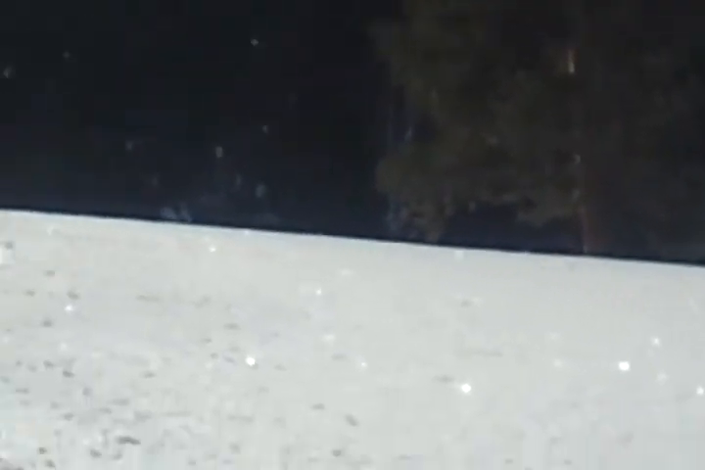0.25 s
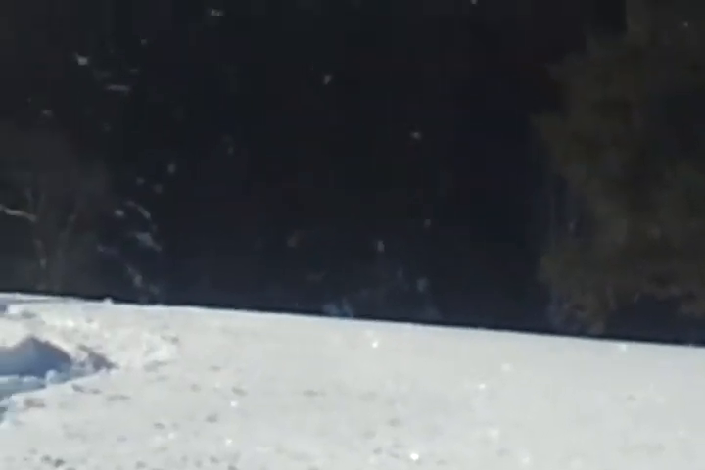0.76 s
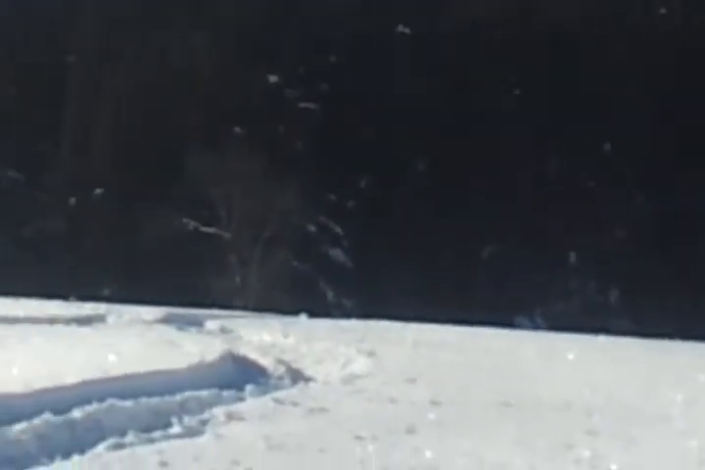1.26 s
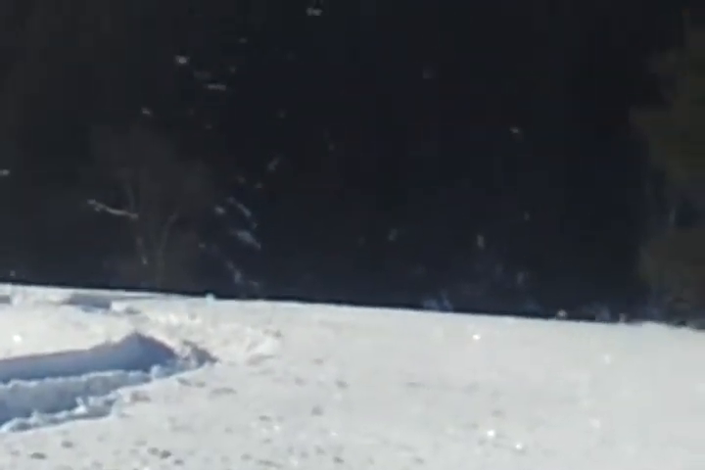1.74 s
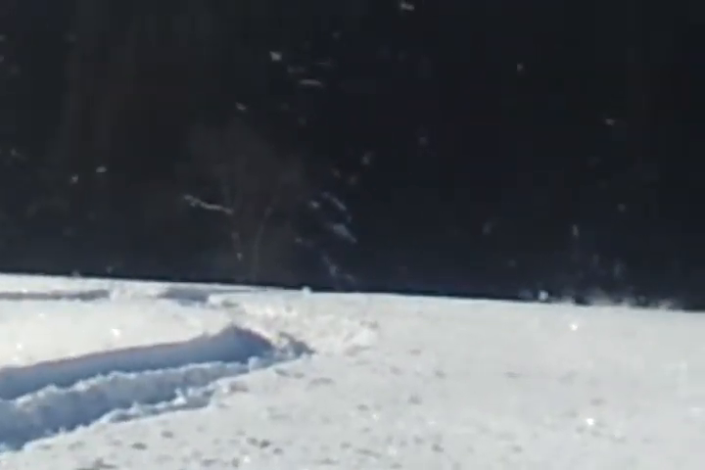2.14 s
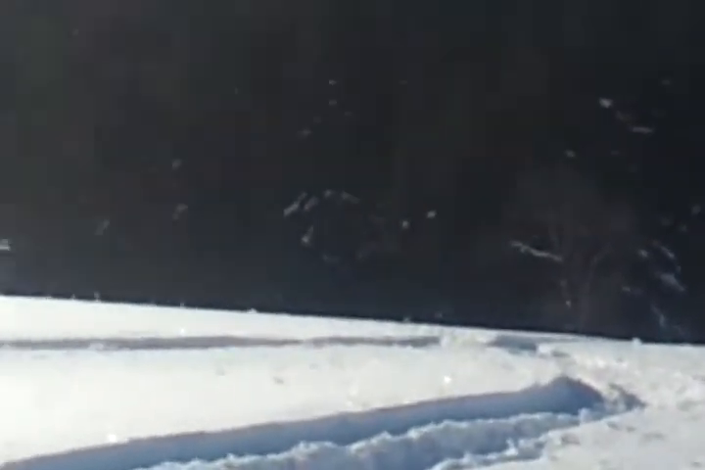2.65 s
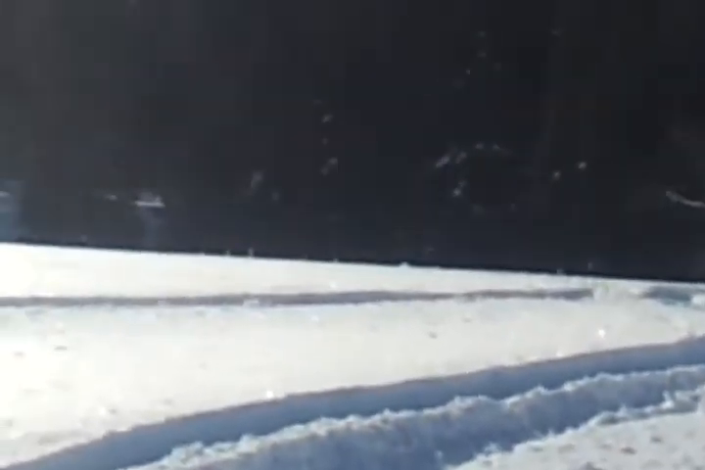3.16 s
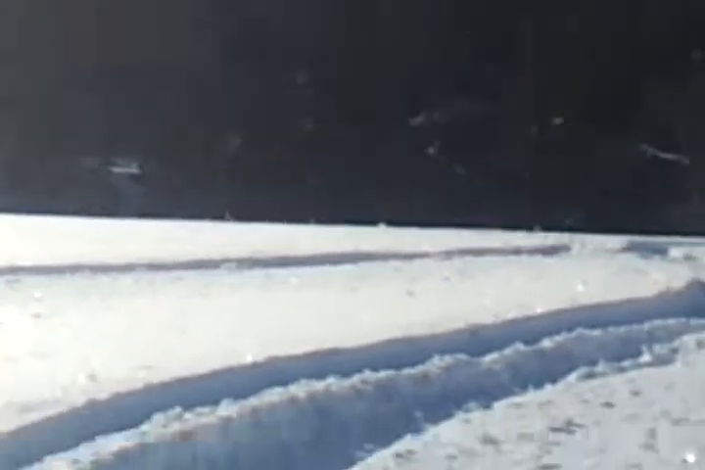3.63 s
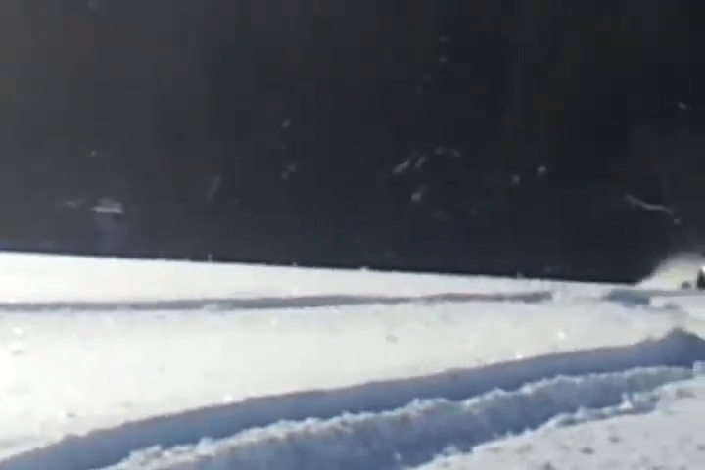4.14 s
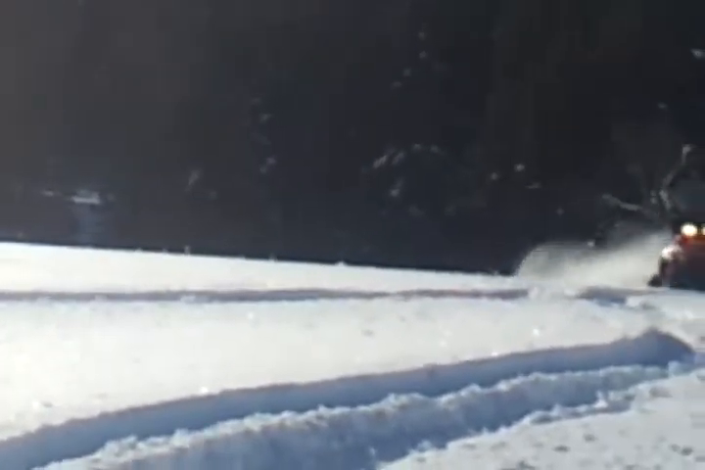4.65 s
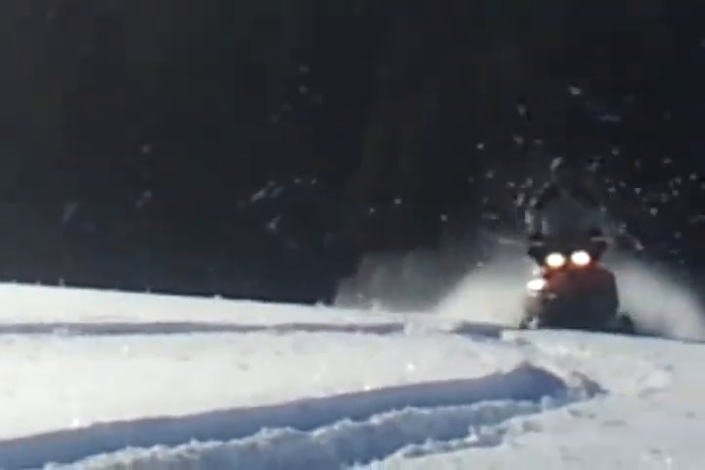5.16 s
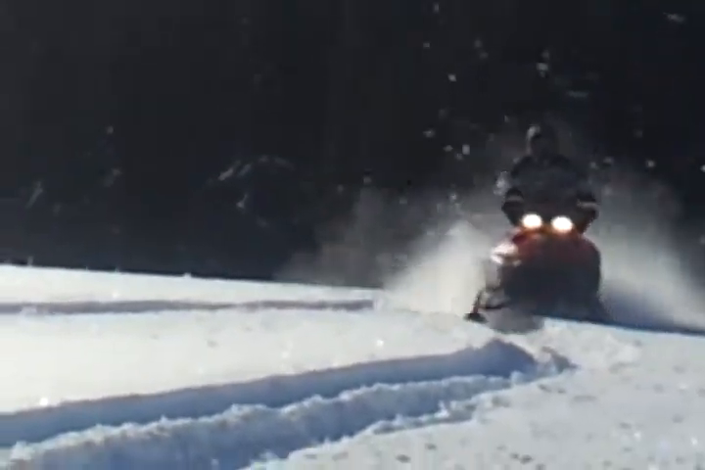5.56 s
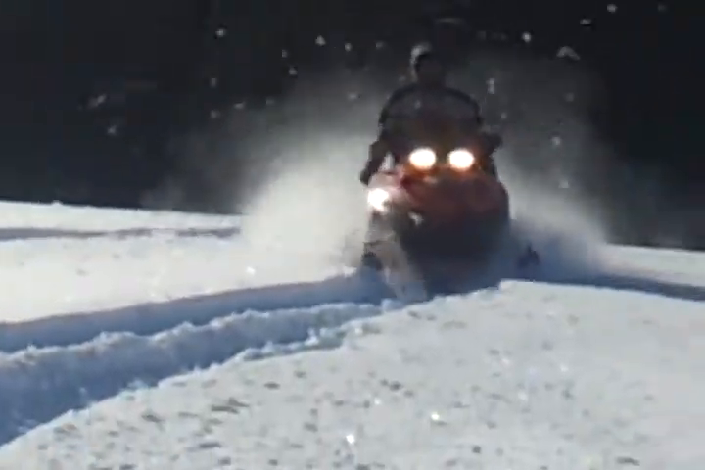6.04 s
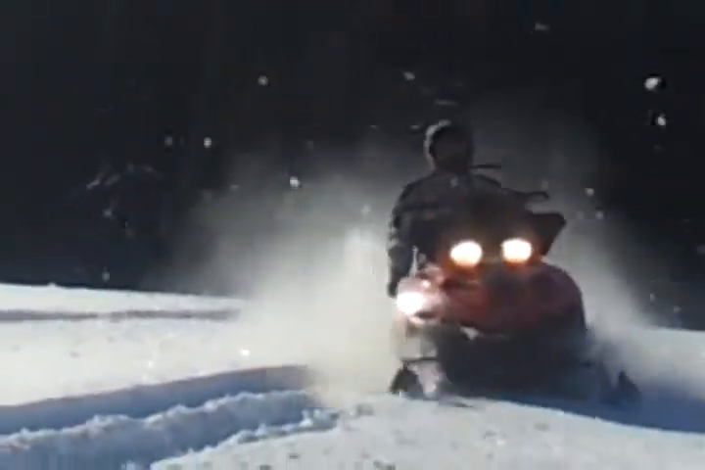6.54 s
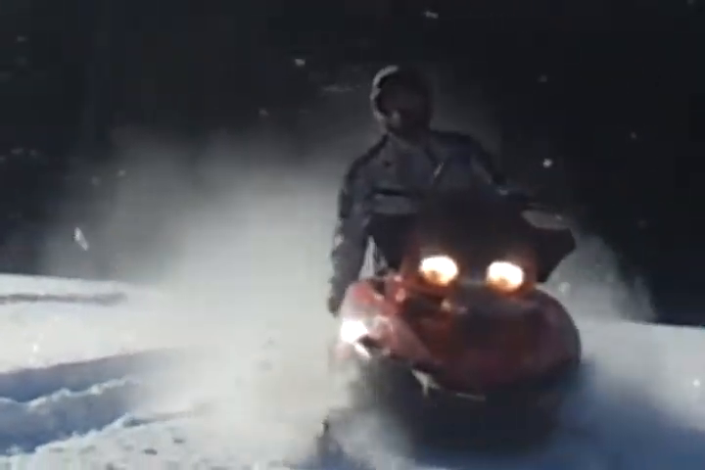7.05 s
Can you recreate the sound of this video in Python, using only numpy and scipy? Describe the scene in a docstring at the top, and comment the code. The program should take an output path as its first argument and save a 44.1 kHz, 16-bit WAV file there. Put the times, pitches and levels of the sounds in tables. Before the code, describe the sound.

On an open, snowy hillside, short rising engine surges from a distant snowmobile come back off the trees. They give way to a sustained, high, buzzing pull as the machine approaches the microphone. The engine cuts back abruptly, blips, misfires and pops, then winds down nearby. Mechanical rattle, low track drumming and the hiss of churned snow grow toward the end.

```python
"""A two-stroke twin snowmobile climbs toward the microphone through deep snow, in bursts of throttle.
Each firing rings its exhaust pipe and booms in the silencer, far off at first and echoed by the forest.
It crests the slope with the pipe on song, hard and bright, then blips, misfires, bangs and coasts up
close with the revs falling, while the clutch clatters, the track drums and the snow sprays."""
import sys
import numpy as np
from scipy import signal
from scipy.fft import rfft, irfft
from scipy.io import wavfile
from scipy.ndimage import uniform_filter1d, map_coordinates

SR = 44100
rng = np.random.default_rng(int(sys.argv[2]) if len(sys.argv) > 2 else 0)


def pcm_store(signal):
    """Save signal as 16-bit PCM."""
    levels = np.round(np.clip(np.atleast_2d(signal), -1, 1) * 32767)
    wavfile.write(sys.argv[1], SR, levels.astype(np.int16).T)


N = 321930


def undb(db):
    """Decibels to gain."""
    return 10 ** (np.asarray(db) / 20)


def curves(table):
    """The columns of a table, joined by straight lines in time."""
    s, *columns = np.transpose(table)
    return [np.interp(np.arange(N) / SR, s, column) for column in columns]


def blend(old, new, share):
    """Move from one value to another by a share of 0 to 1."""
    return old + share * (new - old)


def gate(opens, shuts, attack_s, release_s):
    """0 to 1: a straight attack, a hold and an exponential release."""
    t = np.arange(N) / SR
    return np.clip((t - opens) / attack_s + .5, 0, 1) * np.exp(-np.maximum(t - shuts, 0) / release_s)


def smooth(x, size):
    """Two running means of size samples."""
    return uniform_filter1d(uniform_filter1d(x, size), size)


def steady(x):
    """Hold the running rms at 1."""
    return x / np.sqrt(np.abs(smooth(x * x, SR // 10)) + 1e-12)


def walk(rate_hz):
    """A smooth random drift with a spread near 1."""
    hold = max(int(SR / rate_hz), 2)
    return 1.3 * smooth(np.repeat(rng.standard_normal(N // hold + 1), hold), hold)[:N]


def colour(x, spectrum, size=2048):
    """Ring a body whose causal response has this spectrum."""
    hz, db = np.transpose(spectrum)
    bin_hz = np.arange(size // 2 + 1) * SR / size
    log_gain = np.log(undb(np.interp(np.log(bin_hz + 1), np.log(hz), db)))
    cepstrum = irfft(log_gain)[:size // 2]
    cepstrum[0] /= 2
    response = irfft(np.exp(rfft(2 * cepstrum, size)))
    return signal.oaconvolve(x, response)[:N]


# Wind at the microphone. Each row: frequency in Hz, relative level in dB.
WIND_SPECTRUM = [(20, -7.5), (60, 4), (150, -16), (400, -17), (2000, -24), (8000, -54)]

def wind(level_db=-69.5):
    """Faint wind rumbles on the microphone."""
    return undb(level_db + 1.8 * walk(5.4)) * steady(colour(rng.standard_normal(N), WIND_SPECTRUM))


# Tree lines around the slope. Each row: echo delay in seconds, relative level in dB.
TREE_LINES = [(.235, -4), (.62, -7.5)]
# The tone of the forest's answer. Each row: frequency in Hz, gain in dB.
FOREST_RESPONSE = [(150, -16.5), (330, -19), (470, 4), (600, 2), (1100, 10.5), (1900, -1), (3000, -19),
                   (8000, -2)]
# The engine's reach into the trees, greatest when far off. Each row: time in seconds, gain in dB.
FOREST_SEND = [(0, 0), (.45, 2), (.85, 3), (1.06, 8.5), (1.25, 3), (2.1, -4.5), (2.599, -9.5), (3.2, -13.5),
               (4.2, -26), (7.3, -44)]

def forest(x, tail_db=-9, t60=1.5):
    """Two distinct echoes come back off the tree lines, with a diffuse tail."""
    t = np.arange(SR) / SR
    tail = undb(-60 * t / t60) * rng.standard_normal(SR)
    response = undb(tail_db) * tail / np.linalg.norm(tail)
    for delay_s, db in TREE_LINES:
        response[int(delay_s * SR)] += undb(db)
    return colour(signal.oaconvolve(x, response)[:N], FOREST_RESPONSE)


def snow_bounce(x, gain=0.45, lag_s=0.001133, wander_s=0.00023):
    """A bounce off uneven snow reaches the microphone just late, so overtones swell and fade in turn."""
    late = np.arange(N) - SR * (lag_s + wander_s * walk(2.5))
    return (x + gain * map_coordinates(x, [late], order=1)) / np.sqrt(1 + gain ** 2)


# Churned snow. Each row: frequency in Hz, relative level in dB.
SNOW_SPECTRUM = [(60, -17), (130, -13), (200, -3.5), (320, -11.5), (500, -0.5), (800, -3), (1100, 0),
                 (1450, -5.5), (2000, -0.5), (3000, -18), (8000, -47)]
# The approach to the microphone. Each row: time in seconds, snow level in dB, throb level in dB.
APPROACH = [(0, -44, -54), (2.201, -38.5, -84), (3.4, -38, -67), (4.5, -34.5, -45), (5.8, -31.5, -60),
            (6.3, -32.5, -47), (6.7, -30.5, -41), (7.3, -29, -40)]

def churned_snow():
    """The rush of churned snow grows as the machine nears."""
    snow_db, _ = curves(APPROACH)
    return undb(snow_db + 1.8 * walk(18)) * steady(colour(rng.standard_normal(N), SNOW_SPECTRUM))


def throb(cycle):
    """The two cylinders differ, which adds tones between the firing multiples."""
    _, throb_db = curves(APPROACH)
    tones = [undb(-k + 2 * walk(3.3)) * np.sin(2 * np.pi * (k + .5) * cycle) for k in range(1, 10)]
    return undb(throb_db) * steady(sum(tones))


# The track at close range. Each row: time in seconds, lug rate in Hz, level in dB.
LUG_BEAT = [(5.9, 99.84, -81), (6.3, 96.17, -51), (6.55, 91.9, -45), (6.7, 86.2, -39), (6.95, 73.04, -42),
            (7.1, 67.67, -41), (7.3, 59.6, -59)]

def track():
    """Lugs drum on the snow, dropping in pitch as the machine slows."""
    hz, db = curves(LUG_BEAT)
    level = undb(db + 0.88 * walk(25))
    beats = np.cumsum(hz * (1 + 0.05 * walk(30))) / SR
    return level * np.sqrt(2) * np.sin(2 * np.pi * beats)


def rattle(cycle, size=320):
    """A random pattern, even in colour, that comes round again on every second firing."""
    pattern = irfft(np.exp(2j * np.pi * rng.random(size // 2 + 1)))
    return steady(map_coordinates(pattern, [cycle / 2 % 1 * size], order=3, mode="grid-wrap"))


def puffs(cycle, decay, floor):
    """Gas noise flares at each firing and dies away; decay is in cycles."""
    return steady((np.exp(-(cycle % 1) / decay) + floor) * rng.standard_normal(N))


def firings(cycle, rough, scatter_db=6, top_multiple=75, boom_multiples=5):
    """One sharp pulse a firing, each of its own strength; the lowest multiples are the silencer's."""
    angle = 2 * np.pi * (cycle % 1) + 1e-7
    pulses = np.sin((top_multiple + .5) * angle) - np.sin((boom_multiples + .5) * angle)
    pulses /= np.sin(angle / 2)
    strength = rng.standard_normal(N // 100)[np.round(cycle).astype(int)]
    return steady(pulses * undb(scatter_db * rough * strength))


# Clutch and crank. Each row: frequency in Hz, relative level in dB.
CLATTER_SPECTRUM = [(1410, -18.5), (2400, -9.5), (3110, -9.5), (3380, -16), (3770, -4), (4500, -9),
                    (5080, -7), (5920, -1), (6720, -1.5), (7340, -8), (8110, -30), (8610, -27.5),
                    (8950, -38.5), (11600, -60), (19700, -120)]

def clatter(cycle):
    """Clutch and crank rattle much the same on every turn, in a hiss of flying snow."""
    drive = rattle(cycle) + 1.1 * puffs(cycle, decay=.4, floor=.8)
    flicker = undb(1.35 * walk(220) + .5 * walk(30))
    return steady(colour(drive * flicker, CLATTER_SPECTRUM))


# The pipe's thin wall. Each row: frequency in Hz, relative level in dB.
RASP_SPECTRUM = [(2000, -35), (3350, -18), (3750, 9.5), (4080, -4.5), (4500, 13), (4920, -9.5), (5450, 12),
                 (6100, 8.5), (6700, 6), (7150, -4.5), (7650, -30), (8030, -29.5), (8950, -67.5),
                 (11600, -71.5)]

def rasp(cycle, rough):
    """The steep front of each firing rings the thin metal of the pipe, and gas spits after it."""
    drive = firings(cycle, rough) + (.15 + rough) * puffs(cycle, decay=.45, floor=.15)
    return steady(colour(drive + .3 * rattle(cycle), RASP_SPECTRUM))


# Rasp and clatter together, from far to near. Each row: time in seconds, level in dB.
TREBLE_LEVEL = [(0.0, -58), (0.26, -50.5), (0.71, -57.5), (1.59, -45), (2.07, -49.5), (2.38, -41),
                (2.6, -30), (2.74, -36), (3.33, -21.5), (3.54, -23.5), (3.68, -32), (4.06, -26),
                (4.19, -25), (4.27, -38), (4.31, -38.5), (5.53, -30.5), (5.88, -34), (6.16, -25.5),
                (6.42, -26), (6.93, -22), (7.05, -24), (7.3, -23)]

def top_end(cycle, song, rough, rasp_share=0.65):
    """Mechanical clatter, joined by the rasp of the pipe as it comes on song."""
    level_db, = curves(TREBLE_LEVEL)
    share = rasp_share * song
    rasping = undb(1.3) * np.sqrt(share) * snow_bounce(rasp(cycle, rough))
    clattering = undb(0.53) * np.sqrt(1 - share) * clatter(cycle)
    return undb(level_db) * (rasping + clattering)


# A bang in the pipe. Each row: frequency in Hz, relative level in dB.
BANG_SPECTRUM = [(60, -5), (200, -11), (600, -1.5), (1100, -6.5), (2300, -2.5), (2900, -27), (8000, -59)]
# Stray firings. Each row: start in seconds, peak in dB, length of the miss before it in seconds.
BACKFIRES = [(1.629, -20, 0.011), (4.2328, -23, 0.0082), (4.744, -6.5, 0.027), (4.7603, -9, 0.0026),
             (5.1878, -7, 0.026), (5.2393, -6.5, 0.021), (5.294, -16, 0.01), (5.322, -13, 0.0051),
             (6.146, 0, 0.003)]

def backfires():
    """The mixture goes off in the pipe: one short dull crack each time."""
    kicks = np.zeros(N)
    for s, db, _ in BACKFIRES:
        kicks[int(s * SR)] = undb(db)
    unit_peak = np.abs(colour(np.ones(1), BANG_SPECTRUM)).max()
    return -colour(kicks, BANG_SPECTRUM) / unit_peak


def afterring(hz=178, relative_db=-23.5):
    """Each bang sets the silencer humming briefly."""
    t = np.arange(N) / SR
    return sum(undb(db + relative_db) * gate(s, s, attack_s=0.0023, release_s=0.027)
               * np.sin(2 * np.pi * hz * (t - s)) for s, db, _ in BACKFIRES)


# The throttle snaps shut. Each row: start in seconds, jump in level in dB.
THROTTLE_CHOPS = [(4.244, -28), (4.617, -9), (5.005, 2)]

def misfires(drop_db=-9, recover_s=0.044):
    """A gain: the engine misses before each bang, and its level jolts when the throttle snaps shut."""
    gain, t = np.ones(N), np.arange(SR // 5) / SR
    for s, db in THROTTLE_CHOPS:
        gain[int(s * SR):][:len(t)] = undb(db * np.exp(-t / recover_s))
    for s, _, miss_s in BACKFIRES:
        gain[int((s - miss_s) * SR):int(s * SR)] *= undb(drop_db)
    return uniform_filter1d(gain, 90)


# The engine drawing closer with its throttle shut. Each row: time in seconds, bark in dB.
IDLE_BARK = [(0, -49.5), (2.1, -55), (4.3, -39), (5.9, -36.5), (6.5, -32), (7.3, -31)]
# The last run-down, near the microphone. Each row: time in seconds, firing rate in Hz, boom in dB.
RUN_DOWN = [(5.68, 168.9, -38), (5.792, 155.1, -36.5), (5.998, 144.1, -36), (6.276, 138.1, -30.5),
            (6.598, 129.5, -32.5), (7.182, 115.5, -34.5), (7.272, 113.3, -30.5), (7.29, 113, -32)]
# The boom at firing multiples 1 to 5. Each row: offsets in dB on song (from the climb's boom or note),
# between blips (from the bark), coasting and coasting close by (both from the run-down's boom).
BOOM_OFFSETS = [(-15, 4.5, -14, -1.5), (-2.5, -11, -4.5, -1.5), (-1.5, -2.5, 1, -0.5),
                (-2.5, 1, -15.5, 0.5), (-2.5, -10, 1, 1)]
ATTACK_S = 0.028  # the throttle takes hold

def idling(gulp_db=-5.5, gulp_s=0.039, close_s=6.714):
    """Bark (dB), boom (dB) and roughness with the throttle shut: between blips, then coasting closer."""
    shut_db, coast_db, close_db = np.transpose(BOOM_OFFSETS)[1:, :, None]
    bark, = curves(IDLE_BARK)
    # The boom drops as the throttle shuts, and creeps back.
    shut_times = [blip[1] for blip in THROTTLE_BLIPS[:-1]] + [LONG_PULL[-1][0]]
    gulp = sum(gate(s, s + ATTACK_S, ATTACK_S, gulp_s) for s in shut_times)
    idle_boom = bark + shut_db + gulp_db * gulp
    # Close to the microphone the tone fills out.
    close = gate(close_s, N / SR, attack_s=0.64, release_s=1)
    coast_boom = curves(RUN_DOWN)[1] + blend(coast_db, close_db, close)
    coasting = gate(RUN_DOWN[0][0], N / SR, attack_s=.12, release_s=1)
    rough = blend(0.329, 0.36, coasting)
    return bark, blend(idle_boom, coast_boom, coasting), rough


# Ragged runs of firings. Each row: start in seconds, length in seconds, bark in dB.
SPUTTER_RUNS = [(4.212, 0.023, -18), (5.096, 0.05, -30.5), (5.189, 0.028, -28), (5.233, .025, -28),
                (5.29, 0.034, -29.5), (5.72, .035, -28)]

def sputtering(bark, rough, sputter_rough=0.648):
    """On a nearly shut throttle the engine barks in short, uneven runs."""
    for s, length_s, bark_db in SPUTTER_RUNS:
        on = gate(s, s + length_s, attack_s=0.0082, release_s=0.013)
        bark, rough = blend(bark, bark_db, on), blend(rough, sputter_rough, on)
    return bark, rough


# Blips, far off and then near. Each row: opening and shutting times in seconds, firing rate at each
# in Hz, bark and boom at top revs in dB, roughness from 0 to 1, release in seconds.
THROTTLE_BLIPS = [(0.0, 0.118, 192.2, 208.8, -55, -43, 0, 0.034),
                  (0.219, 0.512, 184.1, 228.1, -41, -41.5, 0.1, 0.032),
                  (0.713, 1.099, 166.4, 241, -37.5, -40, 0.03, 0.026),
                  (1.308, 1.59, 178.5, 214.9, -46, -43, 0.2, 0.045),
                  (1.659, 1.92, 194.6, 229.4, -41.5, -41, 0.21, 0.033),
                  (4.421, 4.605, 170.1, 212, -24, -31, 0.26, .012),
                  (4.755, 4.991, 178, 206.2, -26.5, -31, 0.19, 0.012),
                  (5.317, 5.62, 167.4, 181.8, -32, -29.5, 0.26, 0.14)]

def blipping(bark, boom, rough, hz, bark_db_per_octave=22, boom_db_per_octave=15.5):
    """In each blip of throttle, bark and boom swell with the revs."""
    resonance_db = silencer_resonance(hz)
    for opens, shuts, _, top_hz, bark_db, boom_db, roughness, release_s in THROTTLE_BLIPS:
        on = gate(opens, shuts, ATTACK_S, release_s)
        octaves = np.log2(hz / top_hz)
        bark = blend(bark, bark_db + bark_db_per_octave * octaves, on)
        boom = blend(boom, boom_db + boom_db_per_octave * octaves + resonance_db, on)
        rough = blend(rough, roughness, on)
    return bark, boom, rough


# The long pull up the slope. Each row: time in seconds, firing rate in Hz, then bark, boom and
# the pipe's own note in dB.
LONG_PULL = [(2.14, 180, -42, -44, -53.5), (2.2, 199, -46, -39, -48), (2.32, 229.2, -43.5, -34, -59),
             (2.46, 253.6, -28, -31, -32), (2.54, 261.8, -24, -30, -29), (2.57, 261, -26.5, -29.5, -65),
             (2.61, 261.8, -24.5, -33.5, -34), (2.69, 255, -29.5, -33, -24), (2.85, 237.3, -31, -33, -27),
             (2.96, 233.8, -22.5, -33.5, -28), (3.07, 236.5, -23, -29, -32),
             (3.25, 250.9, -21.5, -28.5, -17), (3.5, 255.2, -22, -28.5, -23),
             (3.69, 247.2, -32, -33.5, -25), (3.89, 246.7, -21, -31, -21.5),
             (4.0, 252.9, -15.5, -29.5, -16), (4.16, 258.9, -16, -27.5, -17),
             (4.21, 259.5, -13.5, -26, -23)]
# The pipe comes on song, then turns ragged as the throttle eases. Each row: time in seconds,
# how fully on song and how rough, both from 0 to 1.
ON_SONG = [(2.2, 0.06, .12), (2.5, 0.72, 0.2), (2.8, 0.89, 0.35), (3.0, 0.93, 0.15), (3.3, 0.96, 0.14),
           (3.9, 0.88, 0.16), (4.19, .94, 0.22), (4.26, 0, 0.44)]

def climbing(bark, boom, rough, hz, song, note_multiple=4, load_follow=0.37, load_bark_db=-25.5):
    """As the climb comes on song, the pipe's own note stands out and the fundamental follows the load."""
    _, pull_bark, pull_boom, note_db = curves(LONG_PULL)
    _, pull_rough = curves(ON_SONG)
    early_boom = pull_boom - 2.5 + silencer_resonance(hz)
    song_boom = np.where(MULTIPLES == note_multiple, note_db, pull_boom) + np.array(BOOM_OFFSETS)[:, :1]
    song_boom[0] += load_follow * (pull_bark - load_bark_db)
    song_reached = np.maximum.accumulate(song) / song.max()
    climb_boom = blend(early_boom, song_boom, song_reached)
    on = gate(LONG_PULL[0][0], LONG_PULL[-1][0], ATTACK_S, release_s=0.029)
    return blend(bark, pull_bark, on), blend(boom, climb_boom, on), blend(rough, pull_rough, on)


def revs(rise_curve=1.25, sag_s=.14):
    """The firing rate (Hz) rises in each blip, follows the climb and run-down, and sags in between."""
    u = np.linspace(0, 1, 8)
    runs = [np.array(LONG_PULL)[:, :2], np.array(RUN_DOWN)[:, :2]]
    for opens, shuts, low_hz, top_hz, *_ in THROTTLE_BLIPS:
        rising_hz = blend(top_hz, low_hz, (1 - u) ** rise_curve)
        runs.append(np.transpose([blend(opens, shuts, u), rising_hz]))
    runs.sort(key=lambda run: run[0, 0])
    sags = []
    for before, after in zip(runs, runs[1:]):
        (shuts, top_hz), (opens, low_hz) = before[-1], after[0]
        fall = 1 - np.exp(-u * max(opens - shuts, ATTACK_S) / sag_s)
        sinking_hz = blend(top_hz, low_hz, fall / fall[-1])
        sags.append(np.transpose([blend(shuts, opens, u), sinking_hz])[1:-1])
    return curves(sorted(map(tuple, np.vstack(runs + sags))))[0]


def overrun(hz, full_fall_s=0.95):
    """0 while the revs hold or rise, 1 when they drop fast."""
    fall_per_s = -SR * np.gradient(np.log(hz))
    return uniform_filter1d(np.clip(full_fall_s * fall_per_s, 0, 1), 1800)


# The silencer under throttle. Each row: frequency in Hz, gain in dB.
SILENCER_RESPONSE = [(170, 0.5), (210, -4), (255, 4), (350, -11), (400, -10), (480, 2.5), (540, 5),
                     (620, -2.5), (720, -7.5), (850, -11), (1000, -2), (1300, -20.5)]
MULTIPLES = np.arange(1, 6)[:, None]

def silencer_resonance(hz):
    """Gain (dB) of each low firing multiple as it sweeps through the silencer's resonances."""
    response_hz, response_db = np.transpose(SILENCER_RESPONSE)
    return np.interp(np.log(MULTIPLES * hz), np.log(response_hz), response_db)


def silencer(cycle, rough, boom_db, lag_cycles=0.055, lead_rad=1.8):
    """The boom: round low tones that trail each pulse and waver when the firing is uneven."""
    angle = 2 * np.pi * (cycle - lag_cycles)
    tones = [undb(db + 2.2 * rough * walk(45)) * np.cos(k * angle + lead_rad)
             for k, db in enumerate(boom_db, 1)]
    return np.sqrt(2) * sum(tones)


# The exhaust pipe on song. Each row: frequency in Hz, relative level in dB.
HARD_PIPE = [(700, -25.5), (1200, -1.5), (1500, -2.5), (1790, 7.5), (2070, 3.5), (2350, -7), (2600, -6),
             (3050, -8.5), (3330, -21.5), (3750, -6.5), (4100, -17.5), (4500, -12.5), (5500, -22.5),
             (9000, -73.5)]
# The pipe off song. Each row: frequency in Hz, relative level in dB.
SOFT_PIPE = [(440, -37.5), (750, 2.5), (887, 0.5), (957, 3), (1220, 8.5), (1450, -17), (1620, 7.5),
             (1730, 7.5), (2180, 2.5), (2460, -19), (3000, -9), (3900, -40), (6600, -120)]

def exhaust(cycle, song, rough, hard_db=2.72, soft_db=2):
    """The bark: pulses and gas ring the pipe, which turns hard and bright on song."""
    drive = firings(cycle, rough) + rough * (.9 * puffs(cycle, decay=.4, floor=.2) + 1.1 * rattle(cycle))
    hard = undb(hard_db) * steady(colour(drive, HARD_PIPE))
    soft = undb(soft_db) * steady(colour(drive, SOFT_PIPE))
    return np.sqrt(song) * hard + np.sqrt(1 - song) * soft


def scene():
    """One microphone on the slope: one crank drives every engine layer, amid snow and forest."""
    hz = revs()
    song, _ = curves(ON_SONG)
    bark_db, boom_db, rough = idling()
    bark_db, boom_db, rough = blipping(bark_db, boom_db, rough, hz)
    bark_db, boom_db, rough = climbing(bark_db, boom_db, rough, hz, song)
    bark_db, rough = sputtering(bark_db, rough)
    # As the revs drop, the firing turns ragged and less carries to the trees.
    falling = overrun(hz)
    rough = np.clip(rough + .5 * falling ** 2, 0, 1)
    carried = undb(curves(FOREST_SEND)[0] - 1.3 * falling)
    cycle = np.cumsum(hz * (1 + .008 * rough * walk(70))) / SR  # counts the firings
    # Far off, much of the bark reaches the microphone by way of the trees.
    bark = undb(bark_db) * snow_bounce(exhaust(cycle, song, rough)) / np.sqrt(1 + carried ** 2)
    boom = undb(-3 * falling ** 2) * silencer(cycle, rough, boom_db) / np.sqrt(1 + .5 * carried ** 2)
    engine = -(misfires() * (bark + boom) + top_end(cycle, song, rough) + throb(cycle))
    background = churned_snow() + wind() + forest(engine * carried)
    return (background + track() + backfires() + afterring() + engine)[None]


def record(dry, top_hz=8900):
    """The recorder rounds the loudest peaks and cuts the top."""
    rounded = np.tanh(0.78 * dry) / 0.77
    return signal.sosfilt(signal.ellip(10, .2, 80, top_hz, fs=SR, output="sos"), rounded)


dry = scene()
out = record(dry)
pcm_store(out)
```